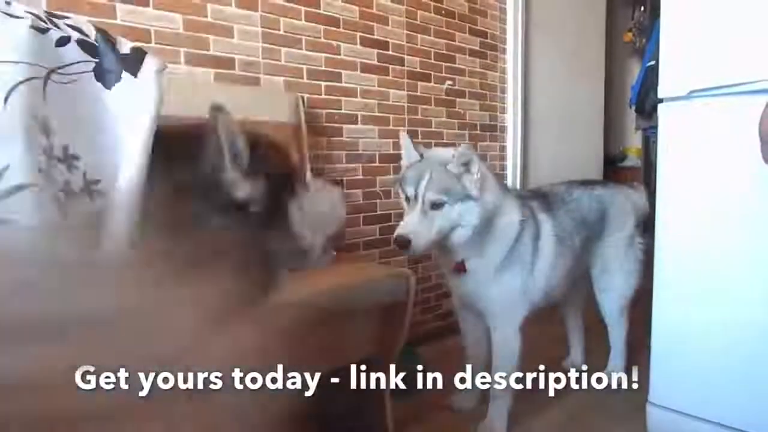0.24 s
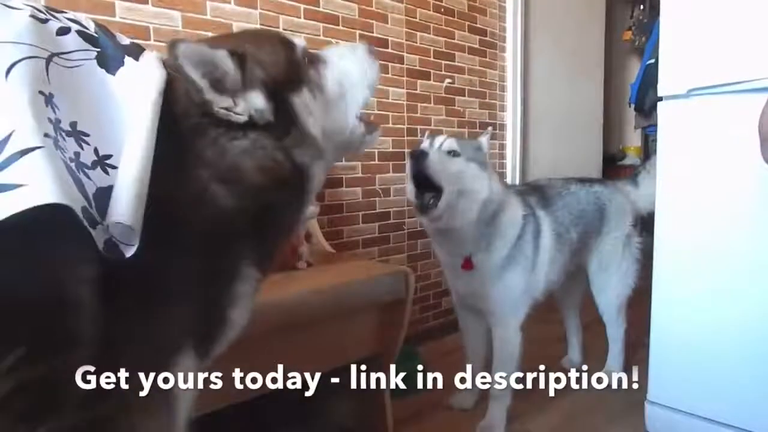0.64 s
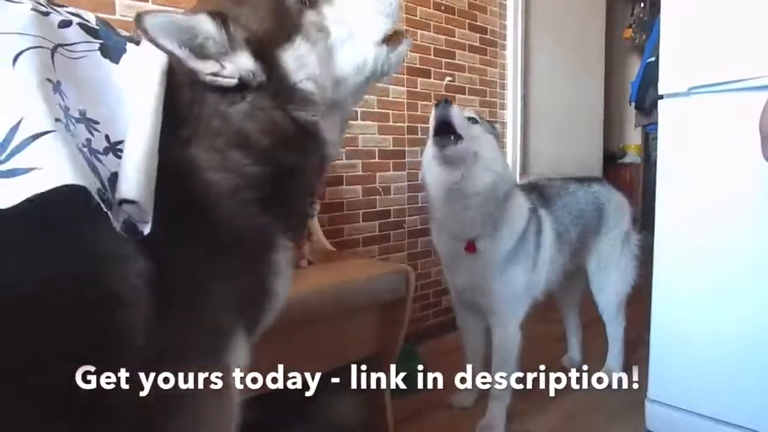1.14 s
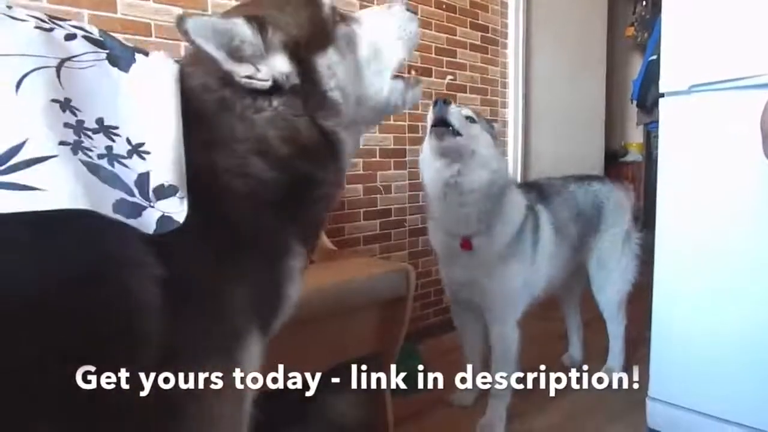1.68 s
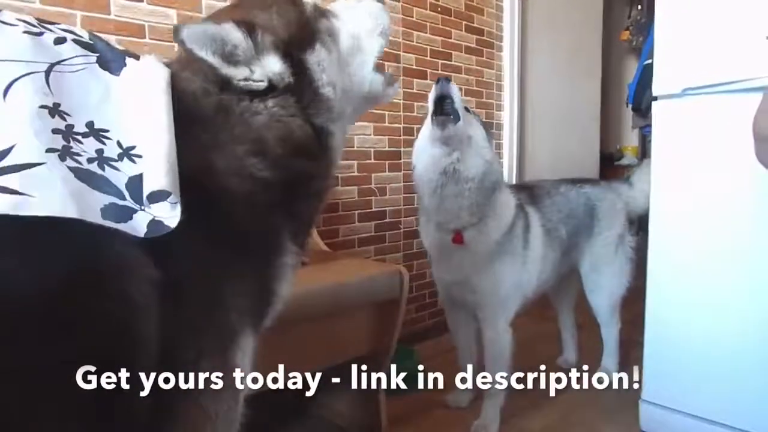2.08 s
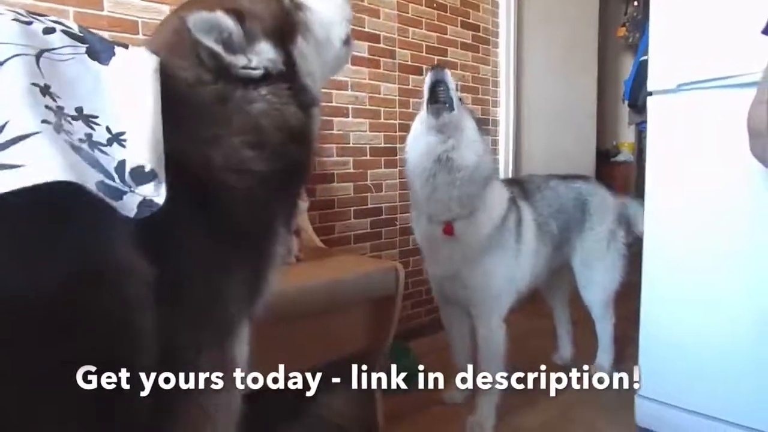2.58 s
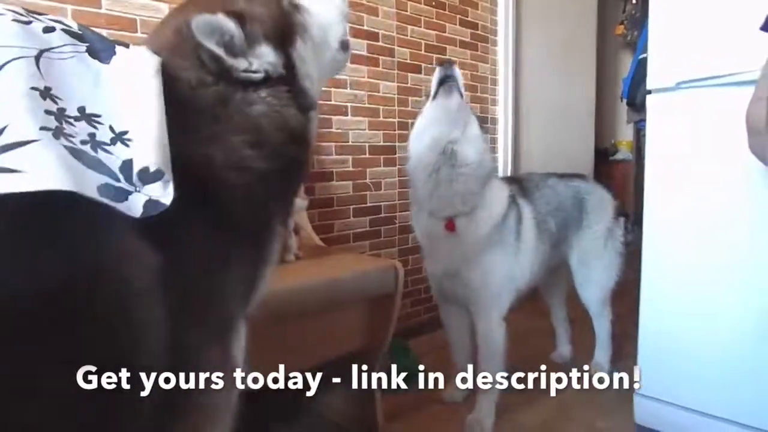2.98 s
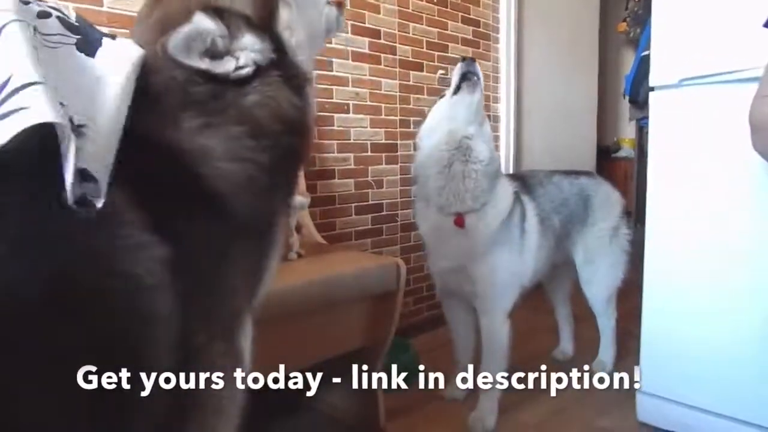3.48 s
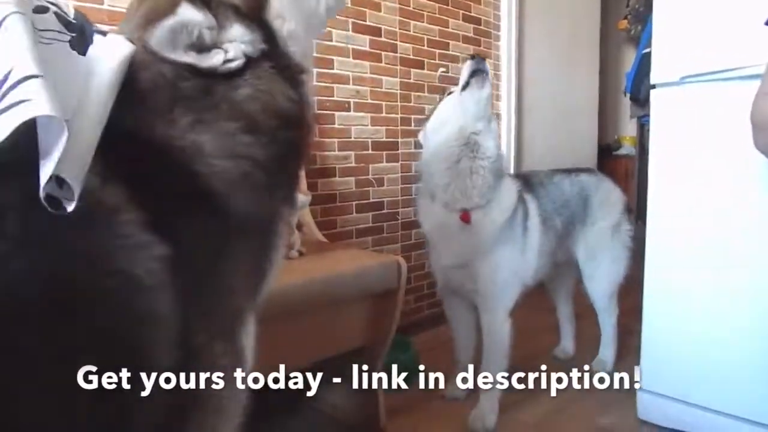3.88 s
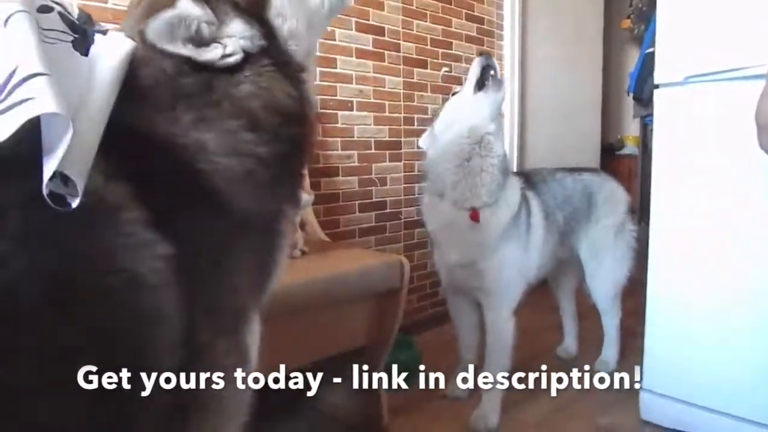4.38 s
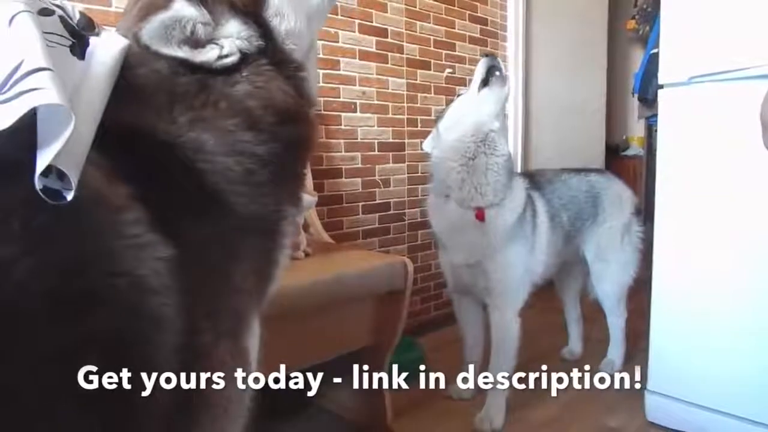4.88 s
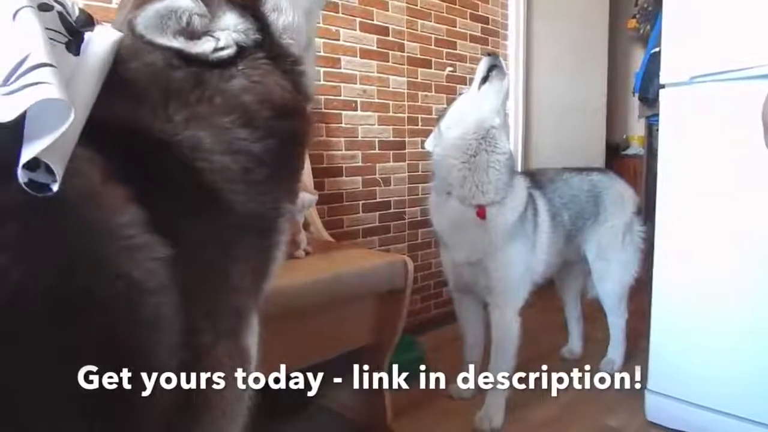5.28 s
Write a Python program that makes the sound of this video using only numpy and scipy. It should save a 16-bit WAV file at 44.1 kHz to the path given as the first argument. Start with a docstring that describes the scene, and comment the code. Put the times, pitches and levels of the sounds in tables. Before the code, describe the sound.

Two large dogs howl together in a small hard-walled kitchen. Overlapping cries open abruptly, then a yelp, a thin high whine, arched howls and a rough yowl. Longer wavering howls follow, one dog sinking into hoarseness as the other soars and slowly slides down. Close single-channel pickup, short bright echo, faint steady room noise.

```python
"""Two huskies howl against each other in a kitchen: long glides, yelps and moans, some breaking into a rasp.
Each voice is a stack of harmonics on a gliding pitch. Throat and mouth resonances pick out the low ones;
a buzz of overtones rings in the muzzle. In a rasp the vocal folds beat irregularly and slap near half pitch.
Hard walls add a short ring; a faint steady noise lies beneath."""
import sys
import numpy as np
from scipy import signal
from scipy.fft import rfft, irfft, next_fast_len
from scipy.io import wavfile
from scipy.ndimage import uniform_filter1d

SR = 44100
rng = np.random.default_rng(int(sys.argv[2]) if len(sys.argv) > 2 else 0)


def generate_wav(signal):
    """Clip the signal to [-1, 1] and save it as 16-bit WAV at the path in sys.argv[1]."""
    frames = np.transpose(np.atleast_2d(signal))
    scaled = np.clip(frames, -1, 1) * 32767
    pcm = np.round(scaled).astype(np.int16)
    wavfile.write(sys.argv[1], SR, pcm)


N = 244347
TIME = np.arange(N) / SR
CUTOFF_HZ = 15700

# brown dog's calls: time_s, pitch_hz, level_db, throat_hz, mouth_hz, muzzle_hz, overtones_db, treble_db
# (throat, mouth, muzzle: resonances; the three levels in dB before the dog's own trims)
BROWN_OPENING_CRY = [(0.0, 706.6, -31, 970, 1920, 4400, -67, -50),
                     (0.05, 714.4, -32, 930, 2080, 3750, -48.5, -71),
                     (0.12, 680, -32.5, 760, 1620, 3570, -66, -91),
                     (0.18, 789, -35, 1570, 1920, 4860, -52, -69),
                     (0.255, 770, -45, 1310, 2220, 4400, -63, -71)]
BROWN_YELP = [(0.39, 505.0, -40.5, 985, 1660, 5500, -46, -48),
              (0.445, 598, -25, 830, 1873, 5460.0, -39, -34.5),
              (0.48, 658, -28, 950.0, 2064, 5600, -36.5, -53),
              (0.53, 700, -37, 886, 2240, 5060.0, -60.5, -71),
              (0.575, 666, -40, 855, 2000, 4770, -40.5, -69)]
BROWN_ARCHED_HOWL = [(0.58, 644, -35.5, 710, 2120, 4740, -48, -70),
                     (0.62, 628, -33.5, 800, 1952, 5040.0, -56.5, -66),
                     (0.66, 663, -26, 850, 2094, 6200, -45, -39.5),
                     (0.72, 709.5, -36, 850, 2240, 3580.0, -64, -59),
                     (0.77, 727, -32, 1150, 1950, 5170.0, -51, -58),
                     (0.81, 697, -41.5, 1040, 2130, 5230, -50.5, -48.5),
                     (0.87, 677.4, -23, 1010, 2116, 4960, -66, -44.5),
                     (0.92, 672.7, -23, 794, 2010, 4226, -53, -51),
                     (1.0, 672, -28, 1013, 2060, 5800, -70, -70),
                     (1.06, 680.3, -29, 890, 1860, 4220, -52, -58),
                     (1.11, 639, -29, 694, 1920, 4700, -56, -64),
                     (1.17, 598, -44.5, 730, 1940, 4660.0, -71, -66),
                     (1.23, 566, -53, 620.0, 1840, 5400, -77, -79)]
BROWN_YOWL = [(1.3, 488, -33, 1024, 1990, 4070, -66, -68), (1.35, 535, -29, 1056, 2150, 4650, -38.5, -46),
              (1.39, 582, -30.5, 1050, 1950, 5820, -56, -46), (1.438, 604, -26, 1130, 1940, 5410, -39, -44),
              (1.458, 503, -34.5, 1070, 2146, 5330, -44.5, -44),
              (1.535, 530, -21, 1053, 2210, 5230, -33.5, -28),
              (1.58, 520, -58, 925.5, 1990, 4680, -62, -70),
              (1.63, 503, -28.5, 1243, 2200, 5000, -45.5, -49),
              (1.68, 492, -28, 1120, 1995, 5980, -54.5, -44), (1.73, 465, -45, 1240, 2350, 5910, -66, -51)]
BROWN_RISING_CRY = [(1.745, 486, -32, 1400, 2340, 6330.0, -43, -36),
                    (1.81, 557.7, -32.5, 800, 1803, 6476, -40, -39),
                    (1.87, 656, -26.5, 724, 1908, 5660, -43.5, -44),
                    (1.92, 689.4, -34.5, 940, 1690, 6070, -59, -53),
                    (1.99, 625, -31, 720, 1590, 6300, -46, -51)]
BROWN_LONG_HOWL = [(2.0, 628, -32, 750, 1740, 6100, -47.5, -47),
                   (2.19, 695, -37, 910, 1580, 6030, -73, -55),
                   (2.23, 699.6, -39, 1073, 1804, 4950.0, -64.5, -58),
                   (2.27, 666, -26.5, 700, 1986, 4600, -54, -58),
                   (2.38, 656, -27.5, 645, 2040, 4600, -73, -59.5),
                   (2.52, 661.9, -24.5, 664, 1966, 4620.0, -51, -57.5),
                   (2.64, 659.6, -25.5, 680, 2030, 4610.0, -57.5, -47.5),
                   (2.74, 615.7, -38, 668, 1730, 5960, -52, -58),
                   (2.825, 589.3, -35.5, 745, 1228, 4150, -66, -51),
                   (2.88, 581.8, -24.5, 716, 1220, 4643, -51, -59),
                   (2.97, 569.2, -43, 941, 1455, 6560, -51.5, -59),
                   (3.07, 541.8, -31.5, 904, 1610, 6060.0, -56, -60),
                   (3.135, 528.2, -29.5, 772, 1854, 5203, -44.5, -41),
                   (3.17, 521.2, -29.5, 818, 1808, 5500, -39, -43)]
BROWN_HOARSE_HOWL = [(3.18, 504, -37, 1300, 1560, 5617, -35.5, -47),
                     (3.25, 448.4, -36, 1250, 1524, 5793, -45, -47),
                     (3.34, 504, -41, 1050, 1740, 5800, -46.5, -47),
                     (3.39, 532.7, -31, 1230, 1670, 5760, -54.5, -43.5),
                     (3.5, 558, -43.5, 1025, 1770, 4270, -45.5, -48),
                     (3.65, 543.7, -33.5, 700, 1610, 5900, -53, -43.5),
                     (3.75, 466.4, -38.5, 800, 1460, 4395, -68, -57)]
BROWN_MOAN = [(4.45, 496, -44.5, 900, 1500, 4400, -43, -59), (4.525, 518, -35, 980, 1400, 3650, -46.5, -62),
              (4.565, 519.4, -31.5, 1050, 1350, 5600, -45, -66),
              (4.635, 534.4, -29, 1130, 1300, 5810, -57, -66), (4.66, 760, -44, 1143, 1850, 5860, -51, -69),
              (4.69, 754, -32, 1140, 1980, 5890, -49.5, -74), (4.76, 679, -51, 1052, 1620, 5990, -51, -76),
              (4.8, 514.6, -45, 980, 1862, 3600, -53, -76), (4.89, 492, -39.5, 920, 2300, 3600, -57, -65)]
BROWN_LAST_CRY = [(5.4, 467.6, -42, 652, 1495, 5040.0, -66, -69),
                  (5.44, 511.7, -29, 692, 1796, 5890, -38, -43),
                  (5.48, 548, -36, 881, 2047, 5480, -41.5, -57),
                  (5.54, 531, -33, 686, 1360, 5750, -38, -74)]
# brief upward break of the voice within the brown yowl, made with the grey dog's settings:
# time_s, pitch_hz, level_db, throat_hz, mouth_hz, muzzle_hz, overtones_db, treble_db
YOWL_CRACK = [(1.555, 643.6, -25, 957, 1960, 4400, -54, -49),
              (1.595, 652, -21.5, 960, 2014, 4760, -44.5, -55),
              (1.625, 619, -51, 1130, 2030, 4800, -52, -44)]
# grey dog's calls: time_s, pitch_hz, level_db, throat_hz, mouth_hz, muzzle_hz, overtones_db, treble_db
GREY_OPENING_CRY = [(0.0, 733, -34, 990, 2046, 4520, -45, -50),
                    (0.12, 734, -41, 910, 1820, 3600.0, -74, -75.0),
                    (0.17, 797, -31.5, 1530, 2070, 4730, -68, -67),
                    (0.21, 874, -40, 1470, 2360, 4740, -61, -69),
                    (0.245, 872, -40, 1480, 2350.0, 4410.0, -72, -71)]
GREY_WHINE = [(0.255, 1106, -29.5, 1050, 2255, 4430.0, -50.5, -61.5),
              (0.355, 1067, -26.5, 984, 2260, 4600, -51.5, -57),
              (0.42, 1060, -36, 1150, 2220, 5540.0, -60, -45),
              (0.5, 1058, -48, 1220, 2180, 5300, -62, -53.5),
              (0.6, 1040, -36.5, 1050, 1870, 4620, -66, -65),
              (0.65, 987, -40.5, 1290.0, 2010, 6100, -65, -61.5)]
GREY_FALLING_HOWL = [(0.63, 809.6, -43, 1180, 1800, 4910.0, -62, -69),
                     (0.74, 784.6, -32.5, 1160, 2070, 3880.0, -70, -74),
                     (0.81, 794.3, -31, 1370, 2100, 5440, -51.5, -62),
                     (0.97, 731.7, -28, 1230, 1790, 4250, -50.5, -57),
                     (1.05, 646, -37.5, 1130, 2174, 5100, -62, -73),
                     (1.13, 501, -41, 1020, 2260, 4890.0, -78, -72),
                     (1.28, 464, -56, 830, 2030, 5130, -73, -73)]
GREY_YIP = [(1.76, 705.5, -31, 1320, 1890, 6400, -40, -33.5),
            (1.82, 795, -32, 1450, 2000.0, 5740, -61, -39), (1.86, 806, -60, 1252, 2090.0, 4950, -45, -51)]
GREY_YOWL = [(2.03, 464, -34.5, 646, 1910, 5660, -42, -65), (2.07, 516, -32.5, 727, 1860, 5880.0, -40, -42),
             (2.17, 605.7, -32.5, 700, 1990, 5470, -41, -42),
             (2.25, 653, -42, 590.0, 1890, 5340.0, -74, -72.5),
             (2.33, 604, -34, 507, 1318, 5670.0, -65, -70),
             (2.38, 516, -60.5, 526, 2200, 6060.0, -63.5, -65)]
GREY_GROWL = [(3.12, 318.3, -37.5, 957, 1340, 5050, -47, -46),
              (3.175, 378, -33.5, 1080, 1500, 5900, -48, -58),
              (3.27, 369.6, -40.5, 1045, 1428, 5880, -50, -63),
              (3.345, 372, -31, 1090, 1290, 5900, -54, -60)]
GREY_LONG_HOWL = [(3.35, 748.5, -37, 930, 1670, 6100, -61, -50),
                  (3.42, 791, -35.5, 890, 1650, 5900, -47, -44),
                  (3.55, 885, -38.5, 915, 1677, 5700, -40.5, -41),
                  (3.6, 942, -31.5, 986, 1741, 5400, -47, -61),
                  (3.68, 928, -37, 917, 1778, 4900, -56.5, -56),
                  (3.8, 845, -37, 960, 1884, 4200, -45, -46.5),
                  (3.88, 804, -35.5, 961, 1701, 5880, -45.5, -41.5),
                  (3.96, 789, -29, 930, 1720, 5986, -36, -44),
                  (4.03, 752, -21, 949, 1930, 5060, -44.5, -48),
                  (4.048, 738, -10.5, 1429, 1760, 5100, -34.5, -44),
                  (4.08, 702.3, -25, 1057, 1875, 5340, -44, -37.5),
                  (4.195, 636, -31.5, 845, 1640, 4810, -46.5, -45),
                  (4.235, 628.7, -30, 900, 1790, 4127, -36.5, -38.5),
                  (4.32, 619.8, -32.5, 900, 1735, 4200, -44.5, -41.5),
                  (4.41, 616.3, -30.5, 904, 1620, 4000, -41.5, -42.5),
                  (4.48, 625, -25, 950, 1480, 4207, -37.5, -33.5),
                  (4.6, 602, -44, 1020, 1500, 5494, -58, -48.5),
                  (4.7, 595, -31, 1029, 1593, 5980, -44.5, -40.5),
                  (4.78, 595.7, -32, 976, 1490, 5800, -50, -38.5),
                  (4.86, 595.7, -26, 910, 1348, 5750, -48, -40),
                  (4.945, 582, -39, 761, 1428, 6127, -46.5, -44),
                  (5.04, 552.3, -37.5, 1430, 1943, 5950, -42, -40),
                  (5.14, 527.8, -28.5, 744, 2012, 5106, -67, -47.5),
                  (5.195, 519.4, -40, 669, 1630, 5300, -61, -48.5),
                  (5.29, 506.5, -26, 662, 1666, 3556, -50, -58),
                  (5.36, 487.2, -27.5, 663.4, 1465, 4230, -58.5, -59),
                  (5.43, 482, -46, 650, 1488, 4480, -66, -52),
                  (5.505, 488, -25, 720, 1450, 6000, -47, -41.5),
                  (5.54, 480, -30, 664, 1458, 5860, -54, -40)]
# turns with each dog's settings: call, hoarseness_0_to_1, roughness_added_by_full_rasp_0_to_1
BROWN_CALLS = [(BROWN_OPENING_CRY, 0.37, 0.56), (BROWN_YELP, 0.24, 0.23), (BROWN_ARCHED_HOWL, 0.03, 0.25),
               (BROWN_YOWL, 0.13, 0.45), (BROWN_RISING_CRY, 0.22, 0.6), (BROWN_LONG_HOWL, 0.023, 0.94),
               (BROWN_HOARSE_HOWL, 0.26, 0.45), (BROWN_MOAN, 0.52, 0.6), (BROWN_LAST_CRY, 0.28, 0.55)]
GREY_CALLS = [(GREY_OPENING_CRY, 0.58, 0.42), (GREY_WHINE, 0.03, 0.09), (GREY_FALLING_HOWL, 0.41, 0.29),
              (YOWL_CRACK, 0.08, 0.22), (GREY_YIP, 0.25, 0.48), (GREY_YOWL, 0.21, 0.42),
              (GREY_GROWL, 0.43, 0.36), (GREY_LONG_HOWL, 0.026, 0.42)]
# gape of the jaws, shared by both dogs: time_s, opening_0_to_1
JAWS = [(0, 0.65), (.44, 0.3), (.66, .45), (1.08, 0), (1.3, 0.98), (1.54, 1), (1.8, 0.52), (2.3, 0.36),
        (3.05, 0.3), (3.21, 0.42), (3.35, 0), (3.53, 0.4), (3.575, .7), (3.62, 0.37), (3.85, 0.5),
        (4.1, 0.7), (4.24, 0.9), (4.29, .3), (4.4, 0.36), (4.46, 0.94), (4.53, 0.74), (4.58, 0.09),
        (5.45, 0)]
# colour of the low harmonics: frequency_hz, gain_db
THROAT = [(450, -6.5), (650, 3), (2100, 7.5), (2400, 0.5), (2900, -25)]
# colour of the overtones, relative: frequency_hz, gain_db
BROWN_MUZZLE = [(2100, -11.5), (3300, -2), (4000, -4.5), (4600, -1.5), (5400, -8), (6400, 2), (7200, -12.5),
                (9000, -32)]
GREY_MUZZLE = [(2500, -24), (3100, -14), (3700, -2), (5000, -2), (6200, 3.5), (6800, 1.5), (7600, -34)]
# colour of the treble, relative: frequency_hz, gain_db
TREBLE = [(6000, -46.5), (7200, -20), (8000, 15.5), (8700, 2.5), (9500, -6), (10400, -15.5), (11200, -46),
          (14000, -37), (16000, -42)]
# treble tilt added by fully open jaws, relative: frequency_hz, gain_db
GAPE = [(10500, 3), (11800, 30)]
# a voice breaks into a rasp: full_strength_s, hold_s, level_db
RASPS = [(0, 0.0083, -33.5), (0.415, 0.02, -51.5), (0.615, 0.015, -41), (1.46, 0.029, -33),
         (1.619, 0.042, -36.5), (1.771, 0.024, -30), (2.056, 0.074, -41), (3.135, 0.096, -34.5),
         (3.299, 0.085, -38.5), (3.503, 0.2, -47.5), (4.083, 0.048, -28), (4.51, 0.025, -44.5),
         (4.664, 0.18, -42), (5.433, 0.11, -33)]
# colour of the rasp through a narrow and a wide mouth, relative: frequency_hz, gain_db
RASP_NARROW = [(80, -44), (400, -20.5), (560, -11), (820, -8.5), (1080, 6), (1450, 4.5), (1750, -32),
               (2100, -6.5), (2450, -31), (4200, -32.5), (6100, -10.5), (7300, -53), (8400, -36.5),
               (11000, -52)]
RASP_WIDE = [(80, -73.5), (420, -41), (680, -26), (830, -19.5), (1080, 17.5), (1500, 10.5), (2150, 15.5),
             (2550, -10.5), (4200, -1), (6000, -42.5), (7200, -64.5), (8400, 0.5), (11000, -22.5),
             (15000, -34)]
# wall echoes, a little weaker in the lows, strongest near 3.5 kHz: frequency_hz, echo_db
WALLS = [(600, -4.5), (2200, -3.5), (3500, 0), (12000, -4)]
# colour of the room's steady noise, relative: frequency_hz, density_db_per_hz
ROOM_TONE = [(20, -39.5), (129, -2.5), (581, 2.5), (1480, -1.5), (2630, -7), (6200, -21.5), (7240, -25),
             (8250, -34.5), (15000, -82.5)]

FORMANT_WIDTH_HZ, MUZZLE_WIDTH_OCTAVES = 85, 0.15
UNEVEN_DB, UNEVEN_SPACING_HZ = 5, 260   # random narrow resonances
SWAY_DB, SWAYS_PER_S = 4.5, 14
TREBLE_FRAYING = .5   # noise depth against the tone
AIR_DB = -28   # hiss of the air through the unstrained muzzle, against the overtones
RASP_RISE_DB_PER_S, RASP_FALL_DB_PER_S = 270, 207.5
FULL_RASP_DB, STRAIN_EXPONENT = -30, 0.58   # how the strain of the folds follows the rasp
KITCHEN_T60_S = 0.19
ROOM_TONE_DB = -58


def brown_dog(rasp_db):
    """Brown dog: small period unevenness and weak cycle alternation; air frays its strained overtones."""
    return dog(BROWN_CALLS, BROWN_MUZZLE, rasp_db, muzzle_peak_db=13.5,
               jitter=0.0012, rough_jitter=0.0263, rough_db=4.0, halving=0.078, tearing=0.26, airy=1.0,
               low_db=0.37, overtone_db=-3.0, treble_db=-8.5, fade_s=.012)


def grey_dog(rasp_db):
    """Grey dog: under strain its level throbs more, its cycles alternate more and its low tone tears more."""
    return dog(GREY_CALLS, GREY_MUZZLE, rasp_db, muzzle_peak_db=15,
               jitter=0.002, rough_jitter=0.0271, rough_db=9.0, halving=0.18, tearing=0.49, airy=0.61,
               low_db=-0.9, overtone_db=-1.5, treble_db=-7.5, fade_s=.012)


def dog(calls, muzzle_colour, rasp_db, muzzle_peak_db, jitter, rough_jitter, rough_db, halving,
        tearing, airy, low_db, overtone_db, treble_db, fade_s):
    """A list of calls; strain rises with every rasp and makes fold cycles uneven in period and strength."""
    push = from_db(STRAIN_EXPONENT * (rasp_db - FULL_RASP_DB))
    tremor, lurch = flutter(rate_hz=20.6), flutter(rate_hz=101.0)
    throb, split = flutter(rate_hz=28.3), flutter(rate_hz=24)
    flap, turbulence = flutter(rate_hz=105), flutter(rate_hz=128)
    fizz = frayed(flutter(rate_hz=190), TREBLE_FRAYING)
    out = np.zeros(N)
    for rows, hoarseness, breaking in calls:
        strain = np.clip(hoarseness + breaking * push, 0, 1)
        unsteady = jitter * tremor + rough_jitter * strain * lurch
        shimmer = from_db(rough_db * strain * throb)
        doubling = halving * strain ** 2 * split
        tear = frayed(flap, tearing * strain)
        air = frayed(turbulence, from_db(AIR_DB) + airy * strain)
        out += howl(rows, muzzle_colour, muzzle_peak_db, unsteady, shimmer, doubling, tear, air, fizz,
                    low_db, overtone_db, treble_db, fade_s)
    return out


def howl(rows, muzzle_colour, muzzle_peak_db, unsteady, shimmer, doubling, tear, air, fizz,
         low_db, overtone_db, treble_db, fade_s):
    """One call: harmonics locked to the cycle of the vocal folds, frayed by turbulence."""
    start_s, end_s = rows[0][0], rows[-1][0]
    on = (TIME > start_s - fade_s) & (TIME < end_s + fade_s)
    t = TIME[on]
    columns = [column[on] for column in in_time(rows)]
    pitch_hz, level_db, throat_hz, mouth_hz, muzzle_hz, buzz_db, top_db = columns
    pitch_hz = uniform_filter1d(pitch_hz, size=600)   # samples
    phase = 2 * np.pi * np.cumsum(pitch_hz * (1 + unsteady[on])) / SR
    harmonics_hz = np.outer(np.arange(1, 28), pitch_hz)
    low_hz, high_hz = harmonics_hz[:5], harmonics_hz[2:]

    tract = gain_at(THROAT, low_hz) * resonance(low_hz, throat_hz) * resonance(low_hz, mouth_hz)
    low = from_db(level_db + low_db) * stack(phase, tract, order=1)

    ripple = overtone_ripple(high_hz, t)
    octaves_off = np.log2(high_hz / muzzle_hz)
    muzzle_peak = from_db(muzzle_peak_db * np.exp(-(octaves_off / MUZZLE_WIDTH_OCTAVES) ** 2))
    muzzle = gain_at(muzzle_colour, high_hz) * muzzle_peak
    buzz = from_db(buzz_db + overtone_db) * stack(phase, muzzle * ripple, order=3)

    gape = gain_at(GAPE, high_hz) ** jaw_opening()[on]
    treble = gain_at(TREBLE, high_hz) * gape
    top = from_db(top_db + treble_db) * stack(phase, treble * ripple, order=3)

    alternate = 1 + doubling[on] * np.sin(phase / 2)   # strong and weak cycles in turn: half lines
    edge_s = np.minimum(t - start_s, end_s - t)
    fade = np.clip(1 + edge_s / fade_s, 0, 1)
    voice = low * tear[on] + (buzz + top * fizz[on]) * air[on]
    out = np.zeros(N)
    out[on] = np.sqrt(2) * voice * shimmer[on] * alternate * fade
    return out


def overtone_ripple(high_hz, t):
    """Overtones swell gliding through narrow resonances; each also comes and goes by itself, at random."""
    bumps = rng.standard_normal(200)
    uneven_db = UNEVEN_DB * np.interp(high_hz / UNEVEN_SPACING_HZ, np.arange(200), bumps)
    turns = rng.standard_normal((len(high_hz), 100))
    sway = np.array([np.interp(t * SWAYS_PER_S, np.arange(100), row) for row in turns])
    return from_db(uneven_db + SWAY_DB * sway) * (high_hz < CUTOFF_HZ)


def resonance(hz, centre_hz):
    """Gain of one resonance of the vocal tract."""
    return 1 / np.hypot(1 - (hz / centre_hz) ** 2, hz * FORMANT_WIDTH_HZ / centre_hz ** 2)


def stack(phase, gains, order):
    """Harmonics from a given order upward, one row of gains each, at constant total power."""
    gains = gains / np.linalg.norm(gains, axis=0)
    return sum(gain * np.sin(k * phase + rng.uniform(0, 2 * np.pi)) for k, gain in enumerate(gains, order))


def frayed(noise, depth):
    """A gain that turns part of a tone into noise and keeps its mean power."""
    return (1 + depth * noise) / np.sqrt(1 + depth ** 2)


def jaw_opening():
    """Gape of the jaws at every sample, 0 to 1."""
    return np.clip(in_time(JAWS)[0], 0, 1)


def rasp_level():
    """Every rasp swells fast, holds and dies away more slowly; in dB."""
    levels_db = []
    for full_s, hold_s, level_db in RASPS:
        rise_db = RASP_RISE_DB_PER_S * np.maximum(full_s - TIME, 0)
        fall_db = RASP_FALL_DB_PER_S * np.maximum(TIME - full_s - hold_s, 0)
        levels_db.append(level_db - rise_db - fall_db)
    return np.max(levels_db, axis=0)


def rasp(rasp_db, wander, throb_db):
    """Folds slap, lurching around half the brown dog's pitch, and ring the throat; jaw gape sets the colour."""
    pitch_hz = in_time(np.vstack([rows for rows, *_ in BROWN_CALLS]))[0]
    scatter = .02 * flutter(rate_hz=120)
    slap_hz = pitch_hz / 2 * np.exp(scatter + wander * flutter(rate_hz=10))
    cycles = np.cumsum(slap_hz) / SR
    slaps = np.diff(np.floor(cycles), prepend=0)   # one pulse per cycle
    source = (slaps - slaps.mean()) * from_db(throb_db * flutter(rate_hz=42.0))
    # all-pass: each throat resonance holds its part of a slap back, so the slaps run together
    radius = .975
    for hz in (700, 1100, 1500, 2000, 4500, 6000):
        poles = [1, -2 * radius * np.cos(2 * np.pi * hz / SR), radius ** 2]
        source = signal.lfilter(poles[::-1], poles, source)
    opening = jaw_opening()
    narrow, wide = coloured(source, RASP_NARROW), coloured(source, RASP_WIDE)
    return from_db(rasp_db) * ((1 - opening) * narrow + opening * wide)


def kitchen(x, first_echo_s):
    """Dense wall echoes that die away quickly."""
    t = TIME[:SR // 2]
    decay = from_db(-60 * t / KITCHEN_T60_S)
    echoes = rng.standard_normal(len(t)) * decay * (t > first_echo_s)
    echoes /= np.linalg.norm(echoes)
    walls = gain_at(WALLS, np.fft.rfftfreq(len(t), 1 / SR))
    return signal.fftconvolve(x, irfft(rfft(echoes) * walls))[:N]


def room_tone():
    """The room's faint steady noise: white noise given a coloured spectrum."""
    return from_db(ROOM_TONE_DB) * coloured(rng.standard_normal(N), ROOM_TONE)


def from_db(db):
    """Decibels to gain."""
    return 10 ** (np.asarray(db) / 20)


def rms_one(x):
    """Scale to unit power."""
    return x / np.sqrt(np.mean(x ** 2) + 1e-20)


def in_time(rows):
    """Each column of a curve at every sample."""
    s, *columns = np.transpose(rows)
    return [np.interp(TIME, s, column) for column in columns]


def gain_at(spectrum, hz):
    """Gain of a spectrum, read on a log-frequency axis."""
    points_hz, db = np.transpose(spectrum)
    return from_db(np.interp(np.log(hz + 1), np.log(points_hz), db))


def coloured(x, spectrum):
    """Filter a sound by a spectrum; rms 1."""
    size = next_fast_len(N + SR // 10)
    gain = gain_at(spectrum, np.fft.rfftfreq(size, 1 / SR))
    return rms_one(irfft(rfft(x, size) * gain, size)[:N])


def flutter(rate_hz):
    """Random wavering up to a given rate; rms 1."""
    sos = signal.butter(2, rate_hz, fs=SR, output="sos")
    return rms_one(signal.sosfilt(sos, rng.standard_normal(N + SR))[SR:])   # first second: settling


def scene():
    """Both dogs and their rasp, the room's ring and its faint steady noise."""
    rasp_db = rasp_level()
    voices = brown_dog(rasp_db) + grey_dog(rasp_db) + rasp(rasp_db, wander=0.054, throb_db=3)
    no_bass = signal.butter(2, 200, "high", fs=SR, output="sos")   # the voices carry no bass below about 200 Hz
    voices = signal.sosfilt(no_bass, voices)
    return (voices + kitchen(voices, first_echo_s=0.0012) + room_tone())[None]


def record(dry):
    """The top is cut steeply."""
    return signal.sosfilt(signal.ellip(10, .1, 80, CUTOFF_HZ, fs=SR, output="sos"), dry)


dry = scene()
out = record(dry)
generate_wav(out)
```